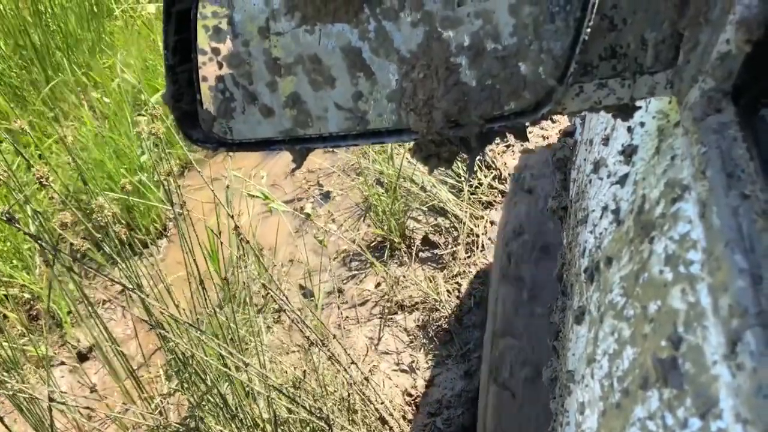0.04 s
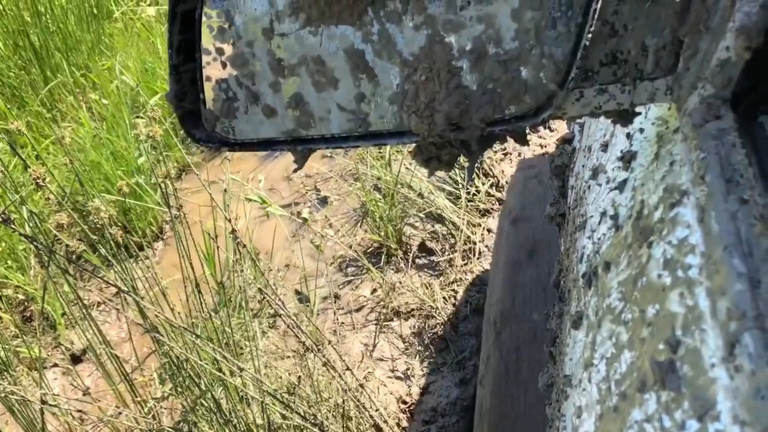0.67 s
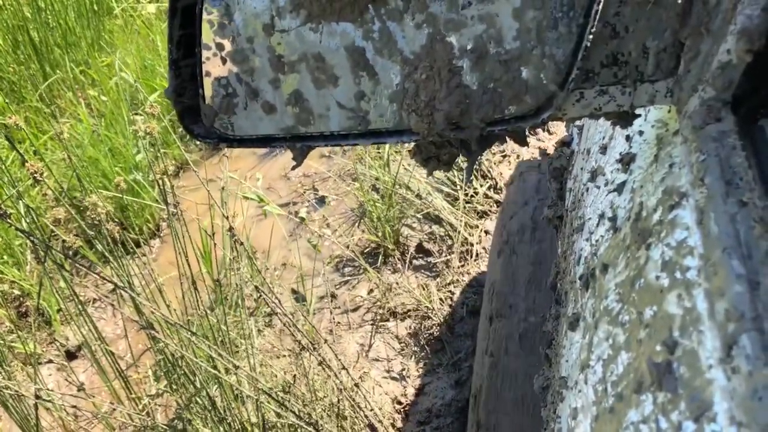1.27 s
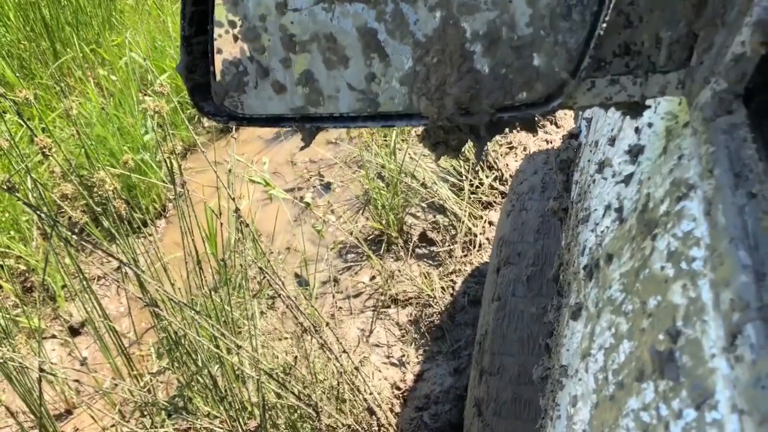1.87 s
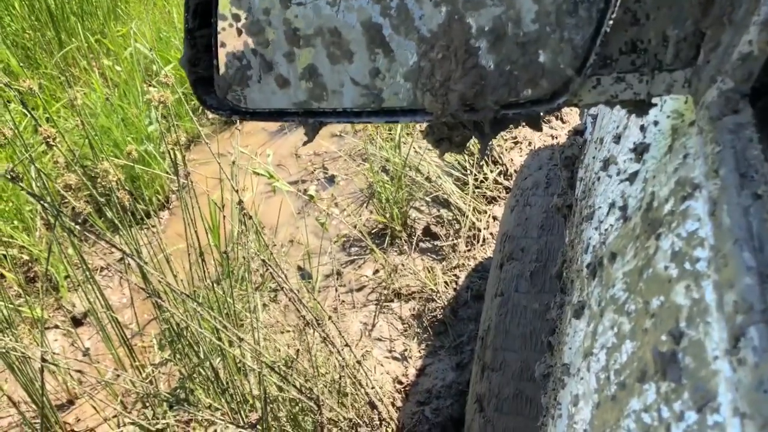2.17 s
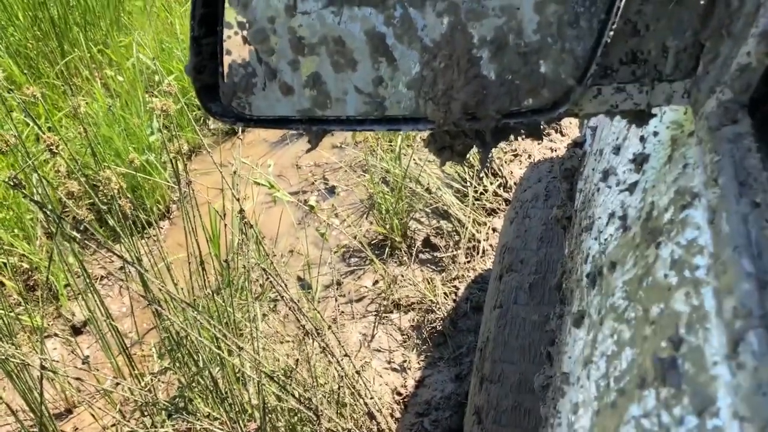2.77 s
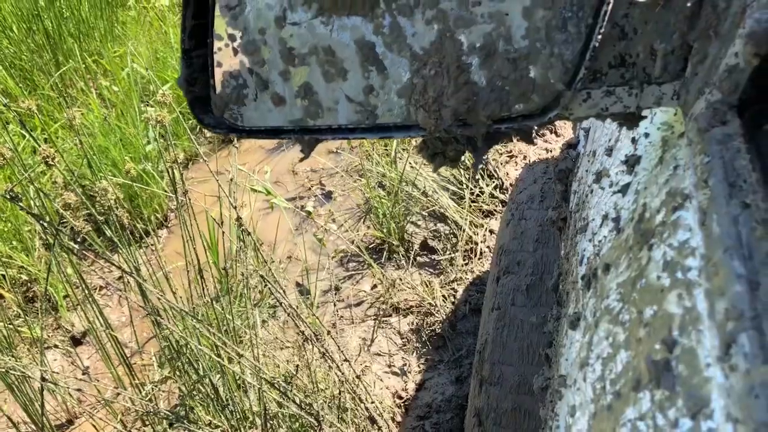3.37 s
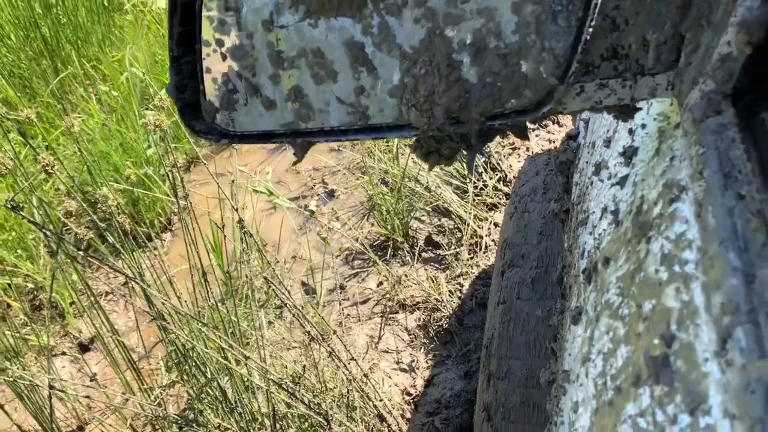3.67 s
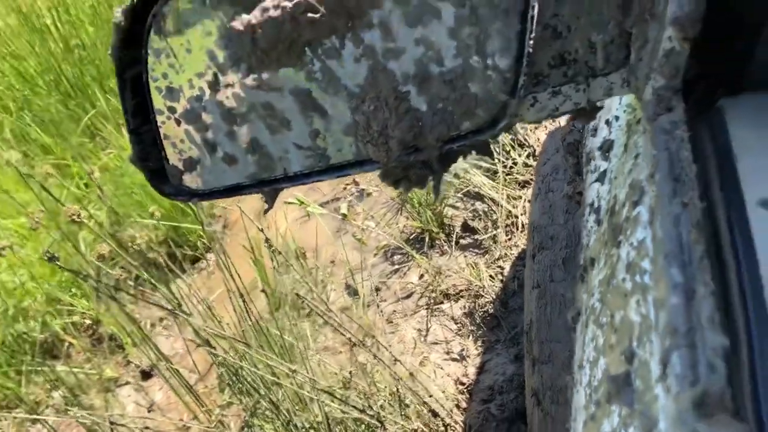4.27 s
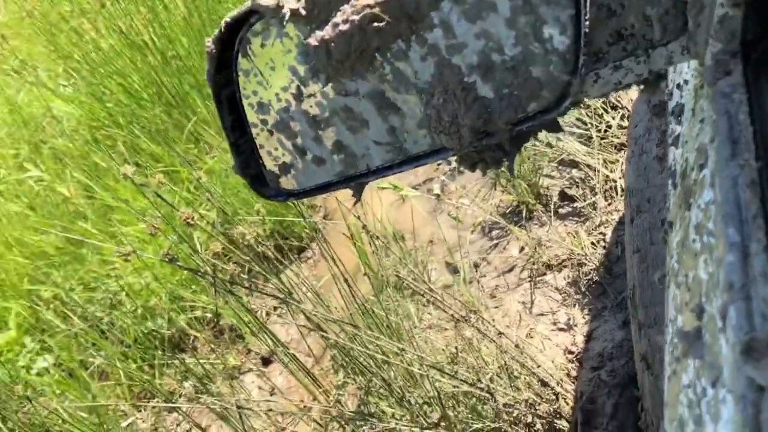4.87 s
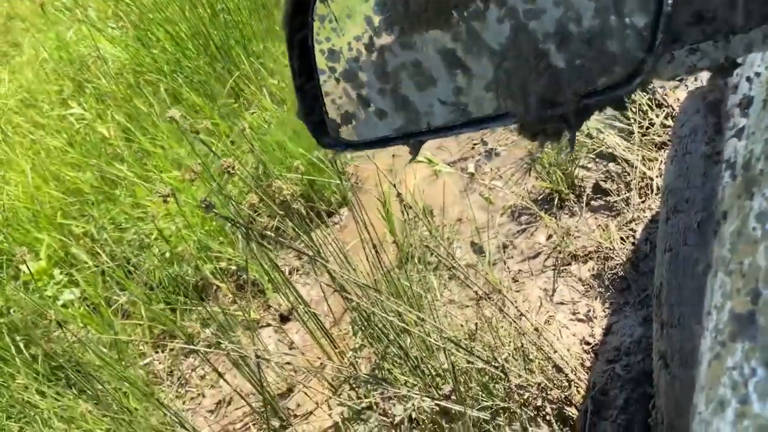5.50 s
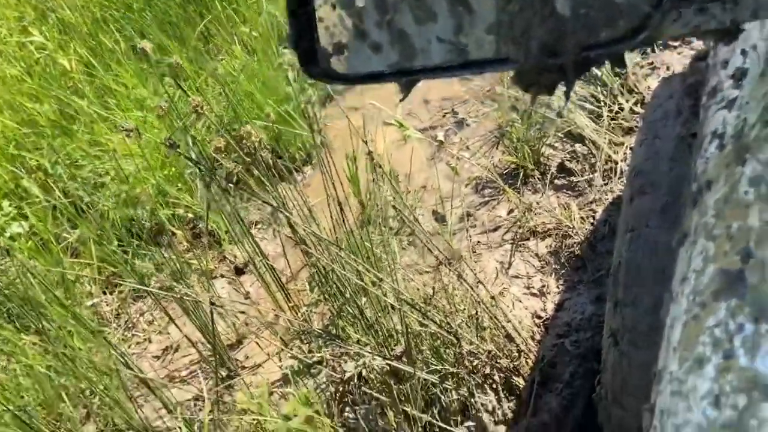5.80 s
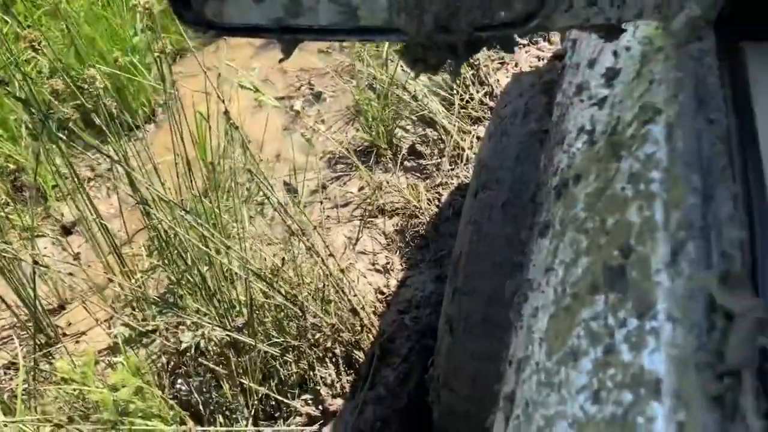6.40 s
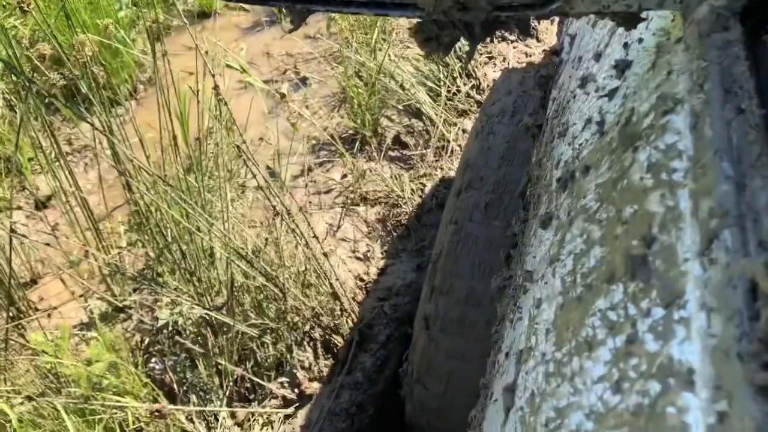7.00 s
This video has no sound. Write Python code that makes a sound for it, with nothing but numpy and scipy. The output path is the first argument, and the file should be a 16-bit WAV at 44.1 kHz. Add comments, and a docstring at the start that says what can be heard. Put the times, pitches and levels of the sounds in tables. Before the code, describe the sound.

Heard from the side window of a pickup bogged down outdoors, the engine pulls hard, its exhaust booming over hissing tyre spray and wet splats on the bodywork. The revs fall away and the engine idles unevenly, rattling, with the fan humming. Two small squirts of muddy water come later, then the throttle opens again with a soft squelch.

```python
"""A V8 pickup stuck in deep mud.

Heard from the side window, the engine pulls hard with a lopsided throb, sinks to a lumpy idle,
then picks up again. Uneven firings ring the exhaust and rattle the metal; speed and throttle set the
loudness. The fan hums and rushes, the tyres churn and spray, and lumps of mud slap the body."""
import sys
import numpy as np
from scipy import signal
from scipy.fft import rfft, irfft
from scipy.io import wavfile
from scipy.ndimage import uniform_filter1d

SR = 44100
rng = np.random.default_rng(int(sys.argv[2]) if len(sys.argv) > 2 else 0)


def inscribe(sig):
    """Save sig as 16-bit PCM at rate SR to the path in sys.argv[1].

    A 1-D sig is mono; a 2-D sig holds one channel per row.
    Samples are clipped to [-1, 1] before scaling.
    """
    pcm = np.round(np.clip(np.atleast_2d(sig).T, -1, 1) * 32767)
    wavfile.write(sys.argv[1], SR, pcm.astype(np.int16))


N = 310905
TIME = np.arange(N) / SR


def gain_of(db):
    """Decibels to gain."""
    return 10 ** (np.asarray(db) / 20)


def evened(x):
    """Scales to rms 1."""
    return x / np.sqrt(np.mean(x ** 2) + 1e-20)


def steadied(x, size=SR // 3):
    """Holds the slow level at rms 1 and keeps the quick throb."""
    return x / np.sqrt(uniform_filter1d(uniform_filter1d(x ** 2, size), size // 2) + 1e-20)


def curve(points):
    """A line through time, joining (seconds, value) points."""
    return np.interp(TIME, *np.transpose(points))


def add(mix, start_s, sound):
    """Mixes a sound in at its start time."""
    part = mix[max(round(start_s * SR), 0):][:len(sound)]
    part += sound[:len(part)]


def colour(x, points, size=16384):
    """A minimum-phase EQ through (Hz, dB) points."""
    hz, db = np.transpose(points)
    bin_hz = abs(np.fft.fftfreq(size, 1 / SR))
    log_gain = np.log(gain_of(np.interp(np.log(bin_hz + 1), np.log(hz), db)))
    taps = np.fft.ifft(np.exp(np.conj(signal.hilbert(log_gain)))).real[:size // 2]
    return signal.oaconvolve(x, taps)[:len(x)]


def band(x, hz, q):
    """One resonance, no higher than SR / 4 and with a Q of at least 0.6."""
    return signal.lfilter(*signal.iirpeak(min(hz, SR / 4), max(q, .6), SR), x)


def lift(x, hz, q, db):
    """What to add to a sound to boost or cut one band."""
    return (gain_of(db) - 1) * band(x, hz, q)


def drift(hz):
    """A random wander of rms 1, up to about the given rate."""
    rolloff = np.exp(-(np.fft.rfftfreq(N, 1 / SR) / hz) ** 2)
    return evened(irfft(rfft(rng.standard_normal(N)) * rolloff, N))


def grains(per_s, spread_db):
    """Sparse clicks of uneven size."""
    size = gain_of(spread_db * np.minimum(rng.exponential(1, N), 4))
    return evened(size * rng.choice([-1, 1], N) * (rng.random(N) < per_s / SR))


def loudness(rpm, throttle, db, doubling_db, throttle_db):
    """A layer's gain: db when coasting at 1000 rpm, more per doubling of speed and with throttle."""
    return gain_of(db + doubling_db * np.log2(rpm / 1000) + throttle_db * throttle)


def firings(cycles, rpm, idle_rpm=800, uneven_db=.8, jitter_ms=.12):
    """One pulse a cylinder; their balance shifts with speed and combustion roughens towards idle."""
    # Each row, in firing order: pulse strength in dB when idling, coasting and pulling,
    # then extra travel down the exhaust in ms.
    cylinders = [(2.5, 9, -14, 1.16), (-5.5, -16, 4, 0.11), (2, 12, 4.5, 2.87), (-3.2, -7, -0.5, 2.74),
                 (2, -0.5, 9, 1.26), (1.9, 8.5, 0.8, 2.72), (1.3, 0.5, 5.5, 0.85), (1.7, 4.2, 2, 1.14)]
    state_rpm = (770, 1220, 1615)  # idling, coasting, pulling
    count = np.floor(cycles * len(cylinders)).astype(int)
    at = np.flatnonzero(np.diff(count)) + 1
    fired = np.array(cylinders)[count[at] % len(cylinders)]
    db = np.array([np.interp(speed, state_rpm, row[:-1]) for speed, row in zip(rpm[at], fired)])
    strength, timing = rng.standard_normal((len(at), 2)).T * (idle_rpm / rpm[at]) ** 2
    late = np.round((fired[:, -1] + jitter_ms * timing) * SR / 1000).astype(int)
    return np.bincount(np.clip(at + late, 0, N), gain_of(db + uneven_db * strength), N + 1)[:N]


def exhaust(pulses, rpm, throttle, cycles, rumble_db=-21.5, split_hz=155):
    """Pulses and turbulent gas ring the pipe: a low boom and a higher bark, clean only at speed."""
    rumble = gain_of(rumble_db) * (1000 / rpm) ** 6.9 * rng.standard_normal(N)
    gas = steadied(burble(steadied(pulses), rpm, cycles) + rumble)
    lead_in = np.tile(gas[cycles < cycles[0] + 1], 4)  # the pipe is already ringing
    sound = pipe(np.concatenate([lead_in, gas]))[-N:]
    low = signal.sosfiltfilt(signal.butter(4, split_hz, fs=SR, output="sos"), sound)
    boom = steadied(low * chug(cycles, rpm, depth_db=2.5, peak_phase=1.0))
    bark = steadied((sound - low) * chug(cycles, rpm, depth_db=2.0, peak_phase=0.86))
    boom *= loudness(rpm, throttle, db=-27.5, doubling_db=14, throttle_db=6)
    bark *= loudness(rpm, throttle, db=-28, doubling_db=13.6, throttle_db=5.1)
    note = speed_eq(boom + bark, rpm, cycles)
    return intake(beats(note, rpm, cycles), throttle)


def pipe(gas, damping_hz=400):
    """Broad and narrow ringing bands give the exhaust its boom and bark, dulled by its packing."""
    # Each row: pitch in Hz, width in Hz, relative gain in dB, polarity.
    ringing_bands = [(47.6, 13, -9.5, 1), (67.2, 2, 1.5, -1), (93.5, 21.6, 14.5, -1),
                     (97.86, 48.7, 12.5, 1), (108.2, 5.1, 1.5, 1), (124.2, 21.8, 9, -1),
                     (143, 4.7, -6.5, -1), (182.7, 9.9, 2.5, 1), (194.7, 2.5, 1.5, 1), (213.6, 4.1, -3, -1),
                     (223.4, 12.5, 4, -1), (254.2, 35.7, -3, -1), (317.4, 13.2, -5, 1), (355.4, 24, -7, -1),
                     (434.5, 22.5, -11.5, 1)]
    # Each row: frequency in Hz, gain in dB.
    tailpipe_eq = [(25, -20), (38, 7.5), (60, 2.5), (200, -1), (400, -1), (520, -8), (800, -14),
                   (2500, -32)]
    ringing = sum(np.sign(sign) * gain_of(db) * band(gas, hz, hz / width)
                  for hz, width, db, sign in ringing_bands)
    packing = signal.butter(1, damping_hz, fs=SR)
    dulled = signal.lfilter(*packing, signal.lfilter(*packing, ringing))
    return colour(dulled, tailpipe_eq)


def chug(cycles, rpm, depth_db, peak_phase):
    """At high speed, one half of every engine cycle blows harder than the other."""
    swing = np.tanh(np.cos(2 * np.pi * (cycles - peak_phase)))
    return gain_of(depth_db * (rpm / rpm.max()) ** 5 * swing)


def speed_eq(sound, rpm, cycles):
    """At certain speeds, bands of the exhaust note grow louder or softer, some throbbing each cycle."""
    # Each row: centre and span in rpm, pitch and width in Hz, lift in dB,
    # once-a-cycle throb in dB, place of its peak in cycles.
    eq_bands = [(1580, 200, 333, 47, -2, -4, .7), (1185, 180, 223, 9.8, 3, 0, .7),
                (1110, 230, 366, 15.5, 6.5, 0.5, .7), (930, 34, 91, 55, -6, -1, .7),
                (593, 56, 42, 35.7, 3.5, 0, .7), (1086, 54, 240, 70, 4, 3, .7),
                (950, 51, 290, 150, -2, 1, .7), (694, 44, 73, 61, -5, -3, .7),
                (1230, 70, 122, 12, 4, 1, .7), (1365, 43, 370, 33, 10, -3.5, .7),
                (1337, 55, 228, 95, -7, -3, .7), (1190, 145, 220, 36.6, 2, 0, 0.59),
                (1170, 310, 353, 200, 4.5, 1.5, .7), (910, 180, 88, 12, 5.5, 6, 0.59),
                (758, 63, 174, 57, 4, 1.5, .47), (720, 210, 355, 35, 1.5, 4.5, 0.41),
                (600, 25, 130, 27, 0.5, 2.5, 0.67)]
    out = sound.copy()
    for centre, span, hz, width, db, throb_db, peak_phase in eq_bands:
        nearness = np.exp(-((rpm - centre) / span) ** 2)
        throb = np.cos(2 * np.pi * (cycles - peak_phase))
        out += lift(sound, hz, hz / width, (db + throb_db * throb) * nearness)
    return out


def beats(sound, rpm, cycles):
    """At some speeds one beat of each engine cycle thumps out in its own band, or is swallowed."""
    # Each row: centre and span in rpm, pitch and width in Hz, lift in dB, place and length in cycles.
    accents = [(1540, 140, 195, 120, 3.5, 0.716, 0.052), (1600, 130, 290, 130, -0.5, 0.99, .08),
               (1580, 140, 79, 55, -2.5, 0.84, .12), (1570, 180, 415, 160, 3, 1, 0.11),
               (1240, 160, 180, 100.6, 7.5, 0.25, 0.076), (1190, 90, 292, 90, 3, 0.47, 0.051),
               (760, 28, 205, 88, 8, 0.4604, 0.05), (795, 21, 169, 80, 2.5, 0.69, .12),
               (680, 76, 205, 110, 3.5, 0.47, 0.078)]
    out = sound.copy()
    for centre, span, hz, width, db, place, length in accents:
        offset = (cycles - place + .5) % 1 - .5
        nearness = np.exp(-(offset / length) ** 2 - ((rpm - centre) / span) ** 2)
        out += lift(sound, hz, hz / width, db * nearness)
    return out


def intake(sound, throttle):
    """A wide-open throttle lets the air intake honk."""
    return sound + lift(sound, hz=345, q=3.6, db=12 * throttle ** 4)


def growl(cycles, rpm, size=4096):
    """One pressure pattern returns every cycle; its harmonics sweep the engine bay's resonances."""
    # Each row: pitch in Hz, width in Hz, relative level in dB.
    bay_modes = [(316.9, 32, 6.5), (424, 24, 3), (466.6, 12, 4.5), (541, 32, -1.5), (602, 43, -2),
                 (692, 26, -7), (757, 15, -2.5), (892, 69, -10.5), (1021, 74, -9.5), (1172, 54, -12.5),
                 (1344, 75, -17)]
    pattern = irfft(np.exp(2j * np.pi * rng.random(size // 32)), size)
    buzz = np.interp(cycles % 1, np.arange(size) / size, pattern)
    voiced = sum(gain_of(db) * band(band(buzz, hz, hz / width), hz, hz / width)
                 for hz, width, db in bay_modes)
    return steadied(voiced * chug(cycles, rpm, depth_db=3.0, peak_phase=0.88))


def clatter(pulses, rpm, ring_s=0.016, grit_db=-8, size=2048):
    """Every firing sets off the same short metallic ring, over steady churning and flying grit."""
    # Each row: frequency in Hz, relative level in dB.
    clatter_eq = [(200, -25.5), (400, -3.5), (570, 0.5), (720, -5.5), (1000, -4), (1400, -12),
                  (2200, -16.5), (4000, -30), (9000, -77)]
    block_ring = rng.standard_normal(size) * np.exp(-np.arange(size) / (ring_s * SR))
    knock = rpm / rpm.max() * steadied(signal.oaconvolve(pulses, block_ring)[:N])
    churn = 1.03 * rng.standard_normal(N)
    grit = gain_of(grit_db) * grains(per_s=360, spread_db=4.0)
    return steadied(colour(knock + churn + grit, clatter_eq))


def rush(flutter_db=1.1, drops_db=-6):
    """Fluttering air from the fan, and water torn by the tread."""
    # Each row: frequency in Hz, relative level in dB.
    rush_eq = [(700, -16.5), (1500, 3.5), (2300, 3.5), (3200, 2), (4400, -3), (6300, -4), (7600, -14.5),
               (9000, -20), (15000, -16.5)]
    air = rng.standard_normal(N) * gain_of(flutter_db * drift(hz=44))
    drops = gain_of(drops_db) * grains(per_s=1600, spread_db=0.5)
    return evened(colour(air + drops, rush_eq))


def spray(cycles, rpm, spurt_db=5.0, flutter_db=1.4, drops_db=1, clump_db=2.0):
    """Fine tyre spray; at high speed a gritty spurt bursts out with each cycle's strong beat."""
    # Each row: frequency in Hz, relative level in dB.
    spray_eq = [(2000, -10), (4500, 0.5), (6500, 8), (8000, 6.5), (9500, 2.5), (12000, 1), (15500, 2.5)]
    open_phase, rise_cycles, fall_cycles = 0.686, 0.045, 0.47
    effort = (rpm / rpm.max()) ** 4
    since = (cycles - open_phase) % 1
    spurt = np.minimum(since / rise_cycles, 1) * np.exp(-(since / fall_cycles) ** 2)
    surge = gain_of(effort * (spurt_db * spurt + flutter_db * drift(hz=73)))
    grit = gain_of(drops_db + clump_db * effort * drift(hz=26)) * grains(per_s=1900, spread_db=1.5)
    return steadied(colour(surge * (rng.standard_normal(N) + grit), spray_eq))


def spatter(slap_s=0.005, size=1024):
    """The spinning tread flings a shower of small lumps, each a brief wet burst."""
    # Each row: frequency in Hz, relative level in dB.
    spatter_eq = [(300, 2), (650, 1.5), (900, 4), (1500, -4.5), (3500, -15), (7500, -28.5), (15000, -15)]
    hits = abs(grains(per_s=380, spread_db=-2.0))
    bursts = signal.oaconvolve(hits, np.exp(-np.arange(size) / (slap_s * SR)))[:N]
    return evened(colour(bursts * rng.standard_normal(N), spatter_eq))


def hollows(sound):
    """The hollows of the wheel well and engine bay ring at narrow pitches."""
    # Each row: pitch in Hz, width in Hz, lift in dB.
    cavity_modes = [(712, 8.3, 2), (1360, 10, 7), (2020, 10, 5), (2270, 35, 2.5), (3230, 57, 3.5),
                    (5380, 13, 6.5), (7000, 90, 1), (7450, 44, 6.5), (8420, 110, 2.5)]
    for hz, width, db in cavity_modes:
        sound = sound + lift(sound, hz, hz / width, db)
    return sound


def splats(thud_db=-4, size=4096):
    """The largest lumps of mud land with a slap and a dull thud an octave below."""
    # Each row: start in seconds, peak level in dB, pitch in Hz, decay in seconds.
    lumps = [(.158, -31, 480, .008), (.308, -19, 2000, 0.0045), (.322, -24, 2600, .003),
             (.364, -21, 1800, 0.0038), (0.434, -17.5, 3000, 0.0044), (0.457, -21, 1800, .003),
             (.609, -17, 1850, 0.0069), (0.626, -14, 1220, 0.0065), (0.723, -17.5, 1360, 0.0027),
             (.848, -29, 1700, 0.0041), (0.899, -16, 550, 0.0068), (0.934, -23, 1500, 0.0027),
             (.994, -24, 1110, 0.0048), (1.079, -20.5, 596, 0.0059), (1.355, -29, 1800, 0.0031),
             (1.383, -26, 1090, .005), (1.737, -23, 897, 0.0049), (2.819, -37, 6950, 0.0051),
             (5.396, -35, 1997, 0.0071), (5.515, -37.5, 3600, 0.008)]
    out, t = np.zeros(N), np.arange(size) / SR
    for start, db, hz, decay in lumps:
        burst = rng.standard_normal(size) * np.exp(-t / decay)
        thud = gain_of(thud_db) * band(burst, hz / 2, q=1)
        slap = band(band(burst, hz, q=1) + thud, hz, q=1)
        add(out, start, gain_of(db) * slap / abs(slap).max())
    return out


def squelches():
    """The tyre squeezes wet mud out in short fizzing swells."""
    # Each row: middle and length in seconds, level in dB, pitch in Hz (capped at SR / 4).
    squeezes = [(1.95, 0.11, -44, 2180), (1.97, 0.15, -45.5, 2680), (3.634, 0.14, -49.5, 2230),
                (3.91, 0.22, -51, 2413), (5.919, 0.11, -59, 10480), (6.117, 0.16, -59, 11000),
                (6.138, 0.077, -52, 5450), (6.235, 0.038, -47.5, 2188), (6.984, 0.2, -40.5, 2320),
                (6.957, 0.25, -51, 6150), (6.952, 0.28, -56, 12500)]
    out = np.zeros(N)
    for middle, length, db, hz in squeezes:
        droplets = grains(per_s=2000, spread_db=0.0)
        fizz = evened(band(band(droplets, hz, q=2.6), hz, q=0.6))
        out += gain_of(db) * fizz * np.exp(-(2 * (TIME - middle) / length) ** 2)
    return out


def fan(level_db=-41, waver_db=3.5, fade_s=0.1):
    """The cooling fan's blades hum a wavering tone that creeps up in pitch and sags at the end."""
    # Each row: time in seconds, blade rate in Hz.
    blade_rate = [(2.5, 123), (3.6, 125), (4.9, 126), (5.3, 129), (5.65, 143), (6.3, 146), (6.9, 138)]
    start, end = blade_rate[0][0], blade_rate[-1][0]
    running = np.clip(np.minimum(TIME - start, end - TIME) / fade_s, 0, 1)
    tone = evened(np.sin(2 * np.pi * np.cumsum(curve(blade_rate)) / SR))
    return running * gain_of(level_db + waver_db * drift(hz=45)) * tone


def whines():
    """Faint tones from the drive line swell and fade, most of them sliding down."""
    # Each row: middle and length in seconds, pitch in Hz, glide in Hz per second, level in dB.
    notes = [(3.28, 0.41, 559.7, -67, -47), (3.36, 1.6, 764, -43.5, -54.5), (3.93, 0.2197, 5180, 0, -65),
             (4.384, 0.21, 566.5, -47, -49), (5.548, 0.53, 556.8, -6, -57), (6.722, 0.13, 574, 0, -47.5),
             (6.895, 0.21, 1180, -60, -49)]
    out = np.zeros(N)
    for middle, length, hz, glide, db in notes:
        t = np.arange(-length / 2, length / 2, 1 / SR)
        tone = evened(np.sin(2 * np.pi * (hz + glide * t / 2) * t))
        add(out, middle - length / 2, gain_of(db) * np.cos(np.pi * t / length) * tone)
    return out


def burble(gas, rpm, cycles, below_rpm=750, span_rpm=100, lope_db=2.0, peak_phase=0.49):
    """At idle the pulses linger in the pipe and lope, one strong and one weaker beat a cycle."""
    idle = np.clip((below_rpm - rpm) / span_rpm, 0, 1)
    angle = 2 * np.pi * (cycles - peak_phase)
    smeared = np.sqrt(1 - idle) * gas + np.sqrt(idle) * muffler(gas)
    return smeared * gain_of(idle * lope_db * (np.cos(angle) + 0.76 * np.cos(2 * angle)))


def muffler(gas, chambers_hz=(85, 125, 170)):
    """Each chamber stores its own band for a moment, smearing the pulses."""
    for hz in chambers_hz:
        gas = gas - 2 * band(gas, hz, q=7.9)
    return gas


def squirts(rise_s=0.0029, fall_s=0.013, lead_s=0.0044, mist_hz=6500):
    """Two sharp squirts: thin mist escapes first, then muddy water bursts out, holds and dies away."""
    # Each row: start in seconds, hold in seconds, level in dB.
    jets = [(5.102, 0.013, -36), (5.172, 0.013, -34)]
    # Each row: frequency in Hz, relative level in dB.
    water_eq = [(250, -15), (500, 8.5), (850, 10.5), (1400, 0.5), (3500, -4), (6000, -8.5), (9000, -16),
                (15000, -21)]
    water = evened(colour(rng.standard_normal(N), water_eq))
    mist = signal.sosfiltfilt(signal.butter(2, mist_hz, "high", fs=SR, output="sos"), water)
    out = np.zeros(N)
    for start, hold, db in jets:
        for sound, onset in (mist, start - lead_s), (water - mist, start + rise_s):
            fade = np.maximum((onset - TIME) / rise_s, (TIME - onset - hold) / fall_s)
            out += gain_of(db) * sound * np.exp(-np.maximum(fade, 0))
    return out


def scene(start_phase=.14, hiss_db=-62.5):
    """Speed and throttle drive the engine and tyre noise; mud, hums and a steady hiss join them."""
    # Each row: time in seconds, crankshaft speed in rpm.
    engine_speed = [(0, 1574), (.14, 1582), (.37, 1604), (.54, 1594), (.71, 1595), (.89, 1495),
                    (1.14, 1359), (1.49, 1228), (1.86, 1195), (2.09, 997.4), (2.34, 813), (2.54, 783.3),
                    (3.01, 794.2), (3.49, 760), (3.94, 726.6), (4.39, 645), (4.84, 600), (5.44, 559),
                    (5.94, 725), (6.09, 726), (6.39, 665.8), (6.73, 647.2), (6.85, 860), (7.05, 1046)]
    # Held down, let go, then stamped on again. Each row: time in seconds, throttle from 0 to 1.
    pedal = [(0, 0.34), (.3, 0.41), (.68, 0.37), (1.05, 0.06), (1.5, 0), (6.72, 0), (6.81, 0.89),
             (7.05, 0.33)]
    rpm, throttle = curve(engine_speed), curve(pedal)
    cycles = start_phase + np.cumsum(rpm / 60 / 2) / SR  # one engine cycle takes two turns
    pulses = firings(cycles, rpm)
    noises = clatter(pulses, rpm) * loudness(rpm, throttle, db=-42, doubling_db=7.36, throttle_db=0.9)
    noises += rush() * loudness(rpm, throttle, db=-45.5, doubling_db=11.05, throttle_db=3.4)
    noises += spray(cycles, rpm) * loudness(rpm, throttle, db=-50.5, doubling_db=19.2, throttle_db=7.5)
    noises += spatter() * loudness(rpm, throttle, db=-55, doubling_db=31.5, throttle_db=11)
    engine = exhaust(pulses, rpm, throttle, cycles)
    engine += growl(cycles, rpm) * loudness(rpm, throttle, db=-41.5, doubling_db=19.3, throttle_db=5.2)
    hiss = gain_of(hiss_db) * rng.standard_normal(N)
    hums = fan() + whines()
    mud = splats() + squelches() + squirts()
    return (engine + hollows(noises) + mud + hums + hiss)[None]


def record(dry, low_cut_hz=32, high_cut_hz=15780):
    """Trims the deepest bass and the very top of the treble."""
    thin = signal.sosfiltfilt(signal.butter(4, low_cut_hz, "high", fs=SR, output="sos"), dry)
    lowpass = signal.firwin(1023, high_cut_hz, window=("kaiser", 9), fs=SR)
    return signal.oaconvolve(thin, lowpass[None], "same")


dry = scene()
out = record(dry)
inscribe(out)
```